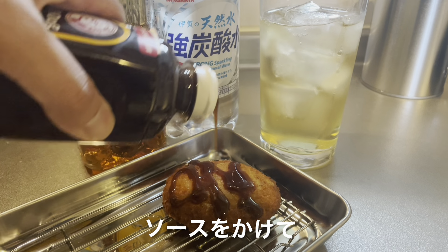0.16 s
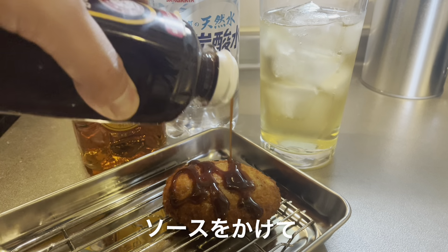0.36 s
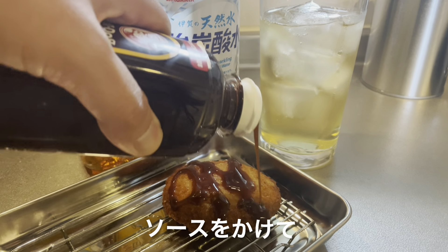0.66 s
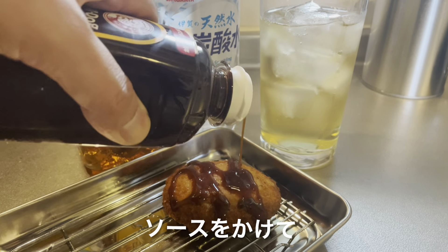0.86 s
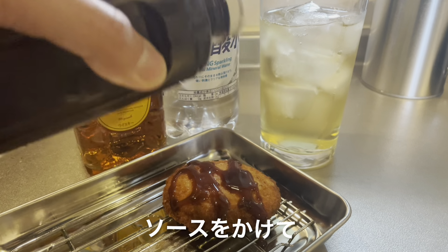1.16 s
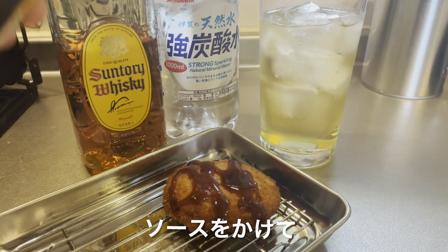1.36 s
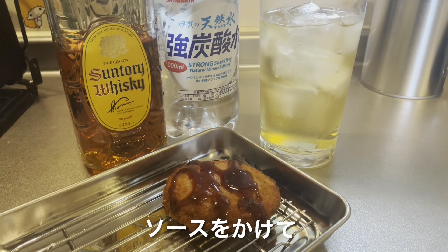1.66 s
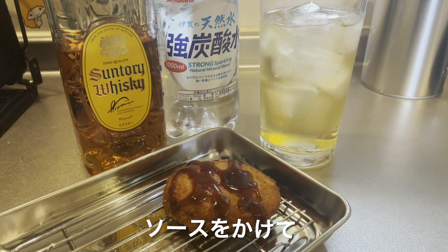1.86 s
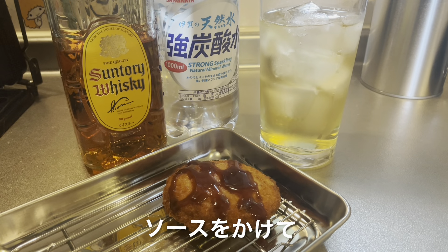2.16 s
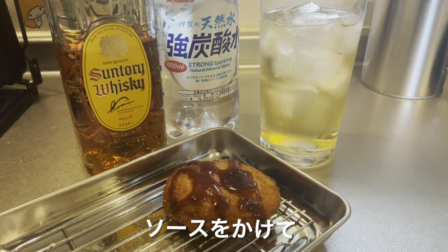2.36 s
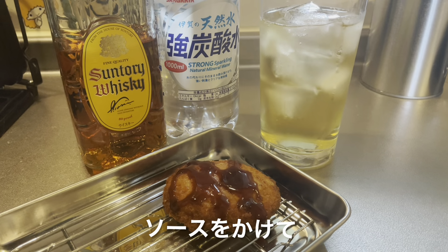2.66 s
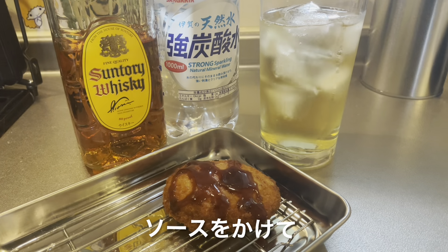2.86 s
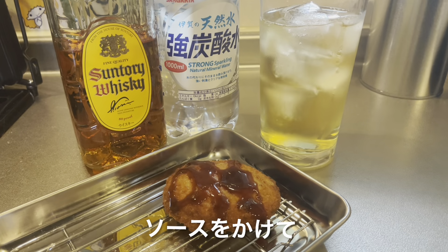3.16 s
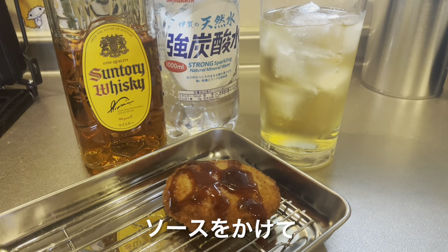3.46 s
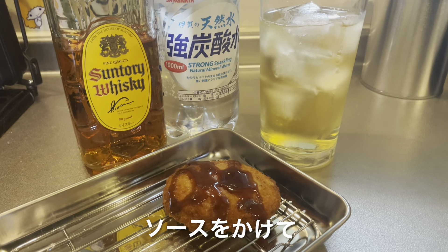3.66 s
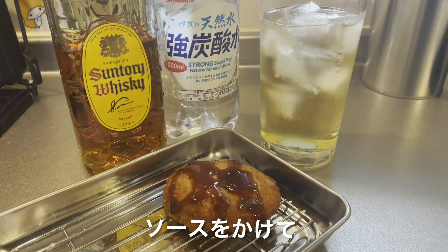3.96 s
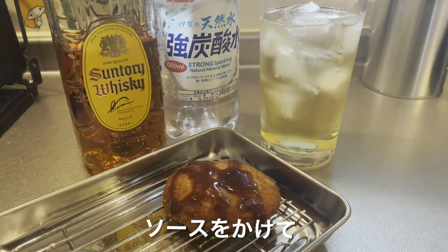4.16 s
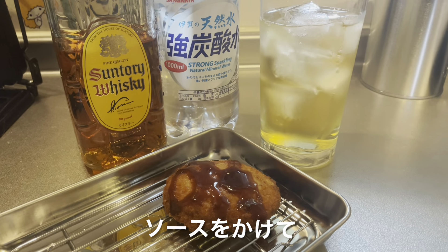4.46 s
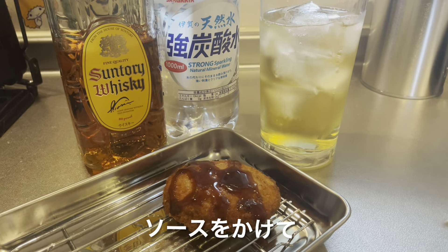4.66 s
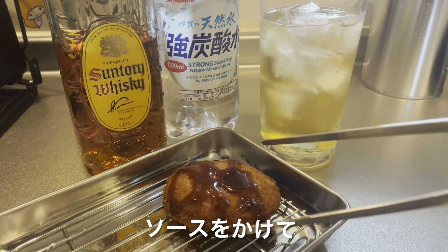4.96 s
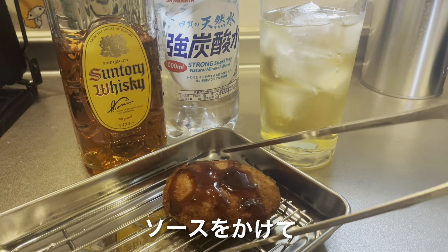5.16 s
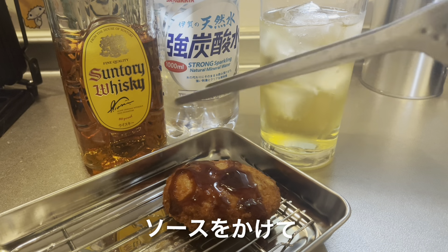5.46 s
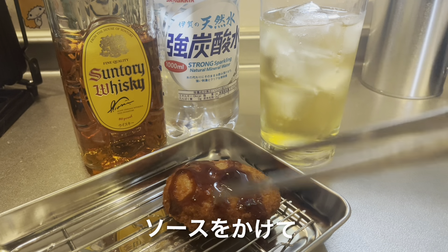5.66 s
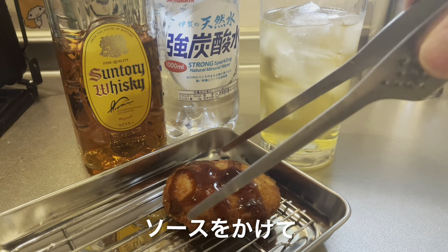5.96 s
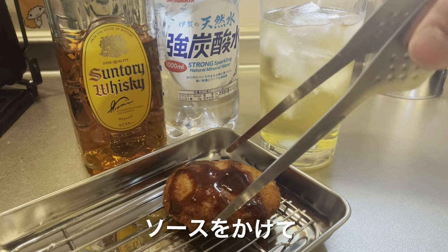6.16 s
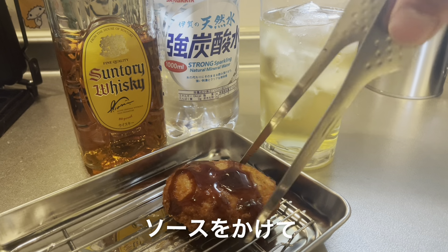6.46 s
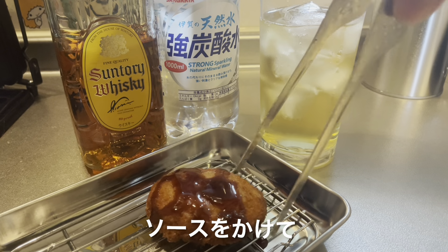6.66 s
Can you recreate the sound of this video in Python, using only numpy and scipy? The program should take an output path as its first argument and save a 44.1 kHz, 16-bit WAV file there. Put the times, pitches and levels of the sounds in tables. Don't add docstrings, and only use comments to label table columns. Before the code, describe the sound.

A small, hard home kitchen heard close up, with a steady low refrigerator hum, soft rumble and slight hiss that swells around 3 s. The first second is nearly still. At 1.0 s a plastic bottle creaks faintly, and at 1.25 s its lid clicks and snaps. Tiny handling ticks follow near 1.5 s. At 2.1 s the cap knocks the neck, rattles, rebounds and grinds, snapping shut sharply at 2.35 s. At 2.52 s the bottle lands hard, the loudest moment, rocking briefly. Around 3.5 s a cupboard door thuds, booms low and bounces several times. Light ticks at 3.7 and 4.2 s. From 4.35 to 4.6 s metal tongs drag off the counter with taps and a faint ping. Quiet returns until 6.15 s, when their tips tick and ring on wires, then scrape rack and steel tray in short, damped strokes until about 6.75 s.

```python
import sys
import numpy as np
from scipy import signal
from scipy.fft import rfft, irfft, next_fast_len
from scipy.io import wavfile
from scipy.ndimage import map_coordinates

SR = 44100
rng = np.random.default_rng(int(sys.argv[2]) if len(sys.argv) > 2 else 0)


def field_ratio(decibels):
    return 10 ** (np.asarray(decibels, dtype=float) / 20)


def wav_out(sig):
    wavfile.write(sys.argv[1], SR, np.round(np.clip(np.atleast_2d(sig).T, -1, 1) * 32767).astype(np.int16))


N = 300321
T = np.arange(N) / SR


def unit(x):
    return x / np.sqrt(np.mean(x ** 2) + 1e-20)


def along(points, hz):
    f, v = np.transpose(points)
    return np.interp(np.log(hz + 1), np.log(f + 1), v)


def gains(rows):
    return field_ratio(np.interp(T, *np.transpose(rows)))


def wobble(rate):
    coarse = T[::SR // 1000]
    knots = rng.standard_normal(int(N * rate / SR) + 4)
    return np.interp(T, coarse, map_coordinates(knots, [coarse * rate]))


def swells(rows, slower=1):
    s, db, rise, fall = np.transpose(rows)[:4, :, None]
    return field_ratio(db - 20 * np.maximum((s - T) / rise, (T - s) / (fall * slower)))


def filtered(x, response):
    m = next_fast_len(x.shape[-1] + SR // 4)
    spectrum = rfft(x, m) * response(np.fft.rfftfreq(m, 1 / SR))
    return irfft(spectrum, m)[..., :x.shape[-1]]


def colour(points):
    return lambda hz: field_ratio(along(points, hz))


def body(modes):
    def response(f):
        total = 0
        for k, (centre, width, db) in enumerate(modes):
            damping = 1j * f * width
            total = total + (-1) ** k * field_ratio(db) * damping / (centre * centre - f * f + damping)
        return total
    return response


def soft(hz):
    return lambda f: 1 / (1 + 1j * f / hz) ** 2


def ringing(force, response):
    answer = irfft(response(np.fft.rfftfreq(SR // 5, 1 / SR)))
    return filtered(force, response) / np.abs(answer).max(axis=-1, keepdims=True)


def grit(rate, rough_db):
    return rng.standard_normal(N) * field_ratio(rough_db * wobble(rate))


# pitch_hz, t60_s
KITCHEN_DECAY = [(60, 0.11), (300, 0.44), (1500, .37), (5000, 0.37), (12000, 0.33)]


def room(x, wet_db):
    hz, t, z = signal.stft(rng.standard_normal(SR // 2), SR, nperseg=256)
    decay = field_ratio(-60 * t / along(KITCHEN_DECAY, hz)[:, None])
    tail = signal.istft(z * decay, SR, nperseg=256)[1]
    tail = tail * np.minimum(np.arange(len(tail)) / 200, 1)
    tail = np.pad(tail, (150, 0))
    return field_ratio(wet_db) * signal.fftconvolve(x, tail / np.linalg.norm(tail))[:len(x)]


# pitch_hz, level_db
CRACK_COLOUR = [(350, -38), (600, -10.5), (1440, -9.5), (2330, -16.5), (2830, -18.5), (3870, -24.5),
                (5460, -18.5), (6170, -16.5), (11100, -34), (13700, -32), (15900, -27)]
# pitch_hz, width_hz, level_db
COUNTER = [(61, 36, -3.5), (113, 16, -2), (169, 10, 0), (255, 290, -8)]


def struck(contacts, modes, wet_db, loose, soft_hz):
    blur = 2.8
    times = np.round(np.transpose(contacts)[0] * SR).astype(int)
    start, stop = times.min() - SR // 50, times.max() + SR * 3 // 5
    blows, cracks, thumps = np.zeros((3, 2, stop - start))
    t = np.arange(SR // 10) / SR
    for at, (_, db, crack_db, thump_db, ms) in zip(times - start, contacts):
        chatter = rng.standard_normal(len(t)) * np.exp(-t * 1000 / ms) * (1 - np.exp(-t / 0.0011))
        chatter /= np.linalg.norm(chatter)
        blows[:, at] += field_ratio(db) * np.array([1, np.hypot(1, loose)])
        blows[0, at:at + len(t)] += loose * field_ratio(db) * chatter
        cracks[0, at:at + len(t)] += field_ratio(db + crack_db + 17.5) * chatter
        cracks[1, at + SR // 150] += field_ratio(db + crack_db + 18)
        thumps[:, at] += field_ratio(db + thump_db)
    wide = [(hz, width * blur, db) for hz, width, db in modes]
    near_and_walls = lambda f: np.array([body(modes)(f), body(wide)(f)]) * soft(soft_hz)(f)
    sound = ringing(blows, near_and_walls) * [[1], [np.sqrt(blur)]]
    sound += ringing(cracks, colour(CRACK_COLOUR))
    sound += ringing(thumps, lambda f: body(COUNTER)(f) * soft(600)(f))
    return np.pad(sound[0] + room(sound[1], wet_db), (start, N))[:N]


# start_s, level_db
HISS_LEVEL = [(0, -73), (1.5, -72), (2.9, -66.5), (5, -70.5), (6.81, -72.5)]
# pitch_hz, level_db
HISS_COLOUR = [(150, -30.5), (250, -4), (400, -7.5), (700, -9), (1240, -11.5), (2100, -15.5), (3500, -19.5),
               (6000, -23.5), (8000, -26.5), (10500, -33.5), (13000, -28.5), (15900, -25)]
# pitch_hz, level_db (per Hz)
RUMBLE_COLOUR = [(15, -55), (28, -13), (45, -2.5), (85, 2.5), (113, -10), (124, -8), (190, -11),
                 (339, -14.5), (375, -20), (500, -22), (650, -40.5), (1100, -120)]
# pitch_hz, level_db (rms)
HUM = [(102.3, -67), (199.2, -68), (452.2, -77), (500.6, -79.5), (597.5, -82.5), (748.3, -80.5),
       (1050, -87), (1098, -84), (1152, -81.5), (1249, -79.5), (1351, -80), (1550, -90.5), (1701, -94),
       (1852, -87.5)]


def kitchen():
    rumble = field_ratio(-60.5 + 0.51 * T) * field_ratio(1.3 * wobble(2.5))
    rumble *= unit(filtered(rng.standard_normal(N), colour(RUMBLE_COLOUR)))
    hiss = field_ratio(4.5) * gains(HISS_LEVEL) * unit(filtered(rng.standard_normal(N), colour(HISS_COLOUR)))
    hum = 0
    for hz, db in HUM:
        level = field_ratio(db + 3.0 + 0.67 * wobble(2.9))
        hum = hum + level * np.sin(2 * np.pi * hz * T + 0.13 * wobble(32))
    return rumble + hiss + hum


# start_s, level_db, crack_db, thump_db, chatter_ms
TICKS = [(1.4595, -46, -23, -37, 2.7), (1.5474, -51.5, -9.5, -40, 30), (1.6194, -58, -33, -28.5, 2.6),
         (2.3156, -35.5, -6.5, -44, 7.3), (2.3214, -36.5, -4.5, -42, 4.5), (2.9098, -51, -3.5, -24, 4.9),
         (3.701, -49, 1, -39.5, 17), (3.7738, -53, -12, -43, 9.3), (4.1949, -46, -4.5, -37, 7.4),
         (5.1554, -58, -15, -39, 5.4),
         (1.4515, -54, -12, -40, 6), (2.507, -43, -6, -40, 4), (3.709, -54, -8, -40, 4),
                 (4.189, -52, -5, -40, 3)]
# pitch_hz, width_hz, level_db
TICK_BODY = [(750, 200, -2.5), (1510, 300, -6.5), (3800, 1500, 2.5), (6400, 2100, 5), (8150, 820, -10.5)]


def ticks():
    return struck(TICKS, TICK_BODY, -11.0, 1.4, 11000)


# start_s, level_db, crack_db, thump_db, chatter_ms
DOOR = [
    (3.5175, -23, -21.5, -13.5, 4.4),
    (3.527, -29, -39, -19, 2.8),
    (3.548, -40, -40, -13, 3.7),
    (3.567, -35.5, -15.5, -18, 7.5),
    (3.598, -35, -14, -20, 3.3),
]
# pitch_hz, width_hz, level_db
DOOR_BODY = [(322, 76, -7), (731, 110, 4.5), (1078, 1600, -23), (1300, 530, -18), (2300, 400, -35)]
# start_s, level_db, crack_db, thump_db, chatter_ms
BOOM = [(3.527, -18.5, -57, -25, 7.9), (3.546, -21, -60, -30, 6.2), (3.566, -24, -60, -29, 5),
        (3.582, -33, -63, -28, 5.5), (3.603, -20, -60, -32, 7.8), (3.63, -31.5, -60, -29, 4.5)]
# pitch_hz, width_hz, level_db
BOOM_BODY = [(59.5, 22, -3.5), (121.6, 39, 0), (166, 45, 0), (340, 86, -12)]
# peak_s, level_db, rise_s, fall_s
SHIVER = [(3.61, -34, .01, 0.15), (4.2, -52, 2.6, 0.1), (4.324, -48, .06, 0.092), (4.574, -61, 0.17, 0.2),
          (5.176, -55, 0.84, 0.28)]


def cupboard():
    phase = 2 * np.pi * np.cumsum(50 + 1.5 * wobble(3.7)) / SR
    after_bump = T > DOOR[0][0]
    swing = np.sqrt(2) * after_bump * swells(SHIVER).sum(axis=0) * np.sin(phase)
    bump = struck(DOOR, DOOR_BODY, -8, 1.0, 2900)
    return bump - struck(BOOM, BOOM_BODY, -12.5, 0.27, 370) + swing


# start_s, level_db, crack_db, thump_db, chatter_ms
SQUEEZE = [(0.986, -45, -32, -22, 2), (0.988, -41.5, -27, -27, 4.2), (0.996, -47, -39, -26, 6.1)]
# pitch_hz, width_hz, level_db
SQUEEZE_BODY = [(624, 170, 2.5), (1390, 100, 6.5), (2200, 500, -5.5), (3600, 860, -14), (6240, 420, -13)]
# start_s, level_db, crack_db, thump_db, chatter_ms
LID = [(1.2325, -38, -19.5, -40, 0.9)]
# pitch_hz, width_hz, level_db
LID_BODY = [(2030, 80, 5), (1630, 300, -8)]
# start_s, level_db, crack_db, thump_db, chatter_ms
SNAP = [(1.269, -24.5, -22, -13, 0.7), (1.2718, -24.5, -36.5, -38, 0.5)]
# pitch_hz, width_hz, level_db
SNAP_BODY = [(491, 49, 4), (1510, 140, 4.5), (1740, 500, -5.5), (2090, 170, 2), (2830, 640, -16),
             (3420, 400, -30), (4170, 280, -14), (4500, 280, -14), (5400, 640, -13)]
# start_s, level_db, crack_db, thump_db, chatter_ms
CAP = [(2.1007, -11.5, -30.5, -26.5, 2), (2.1064, -12.5, -27.5, -20, 1.9)]
# pitch_hz, width_hz, level_db
CAP_BODY = [(371, 80, -9), (732, 54, -17), (1300, 84, 0.5), (1840, 58, -11.5), (3570, 180, -17.5),
            (5000, 200, -17.5), (5890, 380, -23)]
# start_s, level_db, crack_db, thump_db, chatter_ms
GRIND = [(2.1895, -24.5, -12, -38, 4), (2.1925, -23, -6, -40.5, 4), (2.1955, -26, -12.5, -41, 5)]
# pitch_hz, width_hz, level_db
GRIND_BODY = [(159.8, 23, -5), (407, 87, -10.5), (1400, 230, -1), (2010, 63, -12), (3080, 150, -9.5),
              (3690, 450, -12.5), (4720, 380, -10), (6200, 110, -8.5)]
# start_s, level_db, crack_db, thump_db, chatter_ms
RATTLE = [(2.1585, -15, -20.5, -43, 2.9)]
# pitch_hz, width_hz, level_db
RATTLE_BODY = [(1230, 140, -5.5), (1320, 110, 4.5), (1400, 270, -3), (3300, 200, -18), (4700, 410, -13),
               (5923, 600, -19)]
# start_s, level_db, crack_db, thump_db, chatter_ms
REBOUND = [(2.1718, -17.5, -39, -45.5, 0.95), (2.184, -28.5, -45.5, -53, 1)]
# start_s, level_db, crack_db, thump_db, chatter_ms
SHUT = [(2.3483, -15, -10, -26.5, 1.4), (2.3496, -15, -19, -26.5, 0.36), (2.3507, -7, -21.5, -19, 1.2)]
# pitch_hz, width_hz, level_db
SHUT_BODY = [(190, 57, -2), (348, 140, -15.5), (520, 100, -14.5), (737, 120, -4), (865, 63, -3.5),
             (1284, 98, -6.5), (2060, 81, -6), (2320, 190, -0.5), (2680, 200, -3.5), (3060, 350, -16),
             (3570, 130, 0), (3780, 410, -6.5), (4980, 82, -5), (5730, 260, -15), (8850, 4500, -28)]
# start_s, level_db, crack_db, thump_db, chatter_ms
BOTTLE = [
    (2.5225, -19.5, -12.5, -40.5, 1.7),
    (2.5241, -2.5, -9.5, -13.5, 2.5),
    (2.5312, -12.5, -14, -13.5, 3),
    (2.5395, -18.5, -24, -12.5, 2),
    (2.549, -16, -30.5, -21.5, 1.6),
]
# pitch_hz, width_hz, level_db
BOTTLE_BODY = [(187, 84, -7), (291, 82, -6), (430, 22, -8.5), (578, 47, -5.5), (710.2, 27, -4.5),
               (870, 67, -7.5), (1370, 110, 0), (1520, 90, 0.5), (2120, 100, -5), (2300, 130, -8.5),
               (3350, 190, -12.5), (4320, 360, -14.5), (6250, 830, -20), (8130, 930, -17)]


def bottle():
    clicks = struck(SQUEEZE, SQUEEZE_BODY, -12.0, 1.53, 6000)
    clicks += struck(LID, LID_BODY, -10.5, .1, 4000)
    clicks += struck(SNAP, SNAP_BODY, -13, 1.0, 4800)
    cap = struck(CAP, CAP_BODY, -12.5, 0.14, 5000)
    cap += struck(GRIND, GRIND_BODY, -14.5, 1.7, 8000)
    cap += struck(RATTLE, RATTLE_BODY, -10.5, .1, 4500)
    cap += struck(REBOUND, RATTLE_BODY[:3], -10.5, .1, 1100)
    cap += struck(SHUT, SHUT_BODY, -14.0, 0.96, 10000)
    return clicks + cap + struck(BOTTLE, BOTTLE_BODY, -8.5, 0.43, 8000)


# peak_s, level_db, rise_s, fall_s, grit_over_body_db
DRAG = [(4.346, -55, .004, 0.035, -9), (4.363, -49.5, .015, .03, -13), (4.39, -28, 0.029, 0.035, -13),
        (4.43, -41.5, 0.024, 0.038, -18.5), (4.47, -44, 0.024, 0.07, -19),
        (4.507, -49.5, 0.054, 0.0364, -10.5), (4.61, -68, 0.18, 0.17, 5.5)]
# pitch_hz, width_hz, level_db
DRAG_BODY = [(179, 55, -4), (303, 100, -3.5), (442, 80, 2), (710, 49, -4.5), (980, 80, 1),
             (1260, 150, -5.5), (1526, 110, -9), (2240, 120, -13)]
# pitch_hz, width_hz, level_db
DRAG_LIFTED = [(184, 80, 0), (303, 120, 5), (490, 90, -3), (640, 36, -2), (1087, 320, -10),
               (1530, 240, -10.5)]
# pitch_hz, level_db
COARSE_GRIT = [(800, -35), (2000, 1), (4000, 2), (7000, -3), (9000, -10), (12000, -53)]
# pitch_hz, level_db
FINE_GRIT = [(6000, -30), (9000, -5.5), (11000, -10.5), (14000, -5), (15900, -4.5)]
# pitch_hz, width_hz, level_db
ARMS = [(5765, 100, 2), (6700, 60, 1.5), (10400, 79, -14), (12300, 92, -21), (13700, 300, -16)]
# pitch_hz, width_hz, level_db
ARMS_LIFTED = [(7700, 40, -3), (8950, 40, -4), (10300, 56, -8), (11800, 50, -5), (15400, 100, 7.5)]
# start_s, level_db, crack_db, thump_db, chatter_ms
TIPS = [(4.3455, -55, -11.5, -24, 4), (4.37, -37, -2, -27, 8.4), (4.378, -36, -15, -23, 4.6),
        (4.405, -39, -5, -23, 2.6), (4.482, -39, -33.5, -28, 9.8), (4.493, -36.5, -27.5, -28.5, 12),
        (4.508, -38, -18, -33, 0.98)]
# pitch_hz, width_hz, level_db
TIP_BODY = [(990, 200, -34), (2110, 220, -0.5), (3530, 330, -8.5), (5130, 430, -9.5)]
# start_s, level_db, crack_db, thump_db, chatter_ms
PING = [(4.405, -46, -40, -38, 2.8)]
# pitch_hz, width_hz, level_db
PING_BODY = [(3560, 8.6, 9), (6340, 30, -19)]


def drag():
    strokes, grit_db = swells(DRAG), np.transpose(DRAG)[-1]
    low = strokes.sum(axis=0)
    mid = field_ratio(grit_db) @ strokes
    high = field_ratio(1.2 * grit_db - 7) @ strokes
    force, down = grit(150, 1.44), T < 4.5
    lift = np.clip((T - 4.405) / 0.031, 0, 1)
    resting = unit(filtered(force, body(DRAG_BODY)))
    leaving = unit(filtered(force, body(DRAG_LIFTED)))
    slide = low * ((1 - lift) * resting + lift * leaving)
    slide += mid * unit(filtered(force, colour(COARSE_GRIT)))
    slide += high * unit(filtered(force, colour(FINE_GRIT)))
    slide += field_ratio(-24.0) * ringing(down * high * force, body(ARMS))
    slide += field_ratio(-33.5) * ringing(~down * high * grit(30, 2.6), body(ARMS_LIFTED))
    taps = struck(TIPS, TIP_BODY, -13.0, 1.6, 6800) + struck(PING, PING_BODY, -18, 0.35, 12000)
    return slide + room(slide, -10.0) + taps


# peak_s, level_db (tray rim), rise_s, fall_s, wires_over_rim_db
SCRAPE = [(6.166, -53, .008, 0.088, 4), (6.224, -53.5, 0.08, 0.012, 0), (6.356, -43.5, 0.0078, 0.079, -5),
          (6.45, -43, 0.043, 0.007, -10.5), (6.516, -47, 0.01, 0.04, -4), (6.562, -48.5, .03, 0.027, -5),
          (6.598, -63, 0.016, 0.035, -1), (6.632, -46, 0.041, 0.034, -10.5),
          (6.65, -50.5, 0.027, 0.095, -17), (6.78, -69, 0.394, 0.019, -18)]
# pitch_hz, width_hz, level_db
TRAY_NEAR = [(1260, 300, -14), (1840, 250, -4.5), (2320, 65, 6), (2680, 150, -5.5), (3250, 250, -4.5),
             (3610, 110, -8.5), (4250, 200, -13), (4620, 150, -12), (5310, 120, -5.5)]
# pitch_hz, width_hz, level_db
TRAY_HELD = [(1010, 61, -5), (1600, 200, -6), (2100, 130, 3), (2730, 120, -10), (3285, 70, -0.5),
             (3550, 100, -15), (4570, 90, -5), (4790, 150, -11)]
# pitch_hz, width_hz, level_db
TRAY_FAR = [(986, 42.4, -1.5), (1830, 64, -0.5), (2010, 100, 0.5), (2300, 180, 0.5), (2770, 80, -7.5),
            (3440, 110, -5.5), (3980, 100, -14), (4600, 150, -9), (5100, 100, -16)]
# pitch_hz, width_hz, level_db
EDGE = [(1530, 68, -6.5), (2140, 58, 0), (2310, 46, -0.5), (2480, 70, -9), (2770, 55, -6), (3200, 57, -2),
        (3660, 28, -3), (4330, 50, -9), (4600, 80, -18), (5000, 60, -16)]
# pitch_hz, width_hz, level_db
FLOOR_PAN = [(142.6, 72, 1), (258, 200, -2.5), (540, 230, -1), (840, 390, -7)]
# start_s, level_db, crack_db, thump_db, chatter_ms
KNOCK = [(6.355, -35, -30, -38, 2.5), (6.366, -38, -32, -26, 5), (6.375, -38.5, -25, -22.5, 8),
         (6.386, -47, -30, -20.5, 3.6), (6.642, -48.5, -29, 5, 6.4)]
# pitch_hz, width_hz, level_db
FREE_WIRES = [(2290, 15, -2), (3300, 50, -10), (4150, 39, -4), (4530, 67, -18), (5270, 98, -2.5),
              (5860, 53, -15.5), (6330, 43, 0), (6800, 78, -3), (7650, 45, 1.5), (8350, 50, -6),
              (9070, 80, -3), (9500, 65, -5), (10500, 72, -10), (12000, 80, -10), (12800, 60, -19),
              (13900, 74, -12), (14300, 85, -4), (15300, 100, -5)]
# pitch_hz, width_hz, level_db
DAMPED_WIRES = [(3340, 180, -4), (4550, 180, -0.5), (5590, 150, -2.5), (6360, 89, -1.5), (6850, 70, -3),
                (7540, 100, 0), (9020, 105, -0.5), (10400, 170, -8), (12000, 130, -7), (13250, 130, -5),
                (14450, 120, -4), (15350, 150, -1)]
# start_s, level_db, crack_db, thump_db, chatter_ms
FREE_TAPS = [(6.1599, -41, -10, -26, 6.7), (6.181, -48, -10.5, -28, 6), (6.2053, -46, -20, -26.5, 9.3),
             (6.219, -46.5, -16, -20, 5)]
# start_s, level_db, crack_db, thump_db, chatter_ms
DAMPED_TAPS = [(6.355, -39, -10, -36, 14), (6.4273, -45, 1.5, -23, 5.8), (6.4474, -43.5, -9, -34, 3.9),
               (6.497, -53, -10, -40, 3), (6.5131, -40.5, -3, -36, 6), (6.5463, -51, 6, -29, 2.3),
               (6.562, -52, -10, -35, 4), (6.5937, -46, -3, -21, 2.2), (6.609, -51.5, -9.5, -33, 3),
               (6.634, -56, -3, -31, 2.7), (6.6431, -48, -5, -30, 2.9), (6.685, -55, -8, -35, 3),
               (6.705, -54, -6, -32, 3), (6.7678, -69, 5, -26.5, 3)]


def scrape():
    strokes = swells(SCRAPE)
    rack = field_ratio(np.transpose(SCRAPE)[-1]) @ strokes
    rub = grit(140, 2.6)
    rim = 0
    for part, modes in zip(np.split(strokes, (3, 4)), (TRAY_NEAR, TRAY_HELD, TRAY_FAR)):
        rim = rim + part.sum(axis=0) * unit(filtered(rub, body(modes)))
    shakes = [(s, db - 15, 0.0044, 0.019) for s, db, *_ in KNOCK]
    floor = field_ratio(-5) * swells(SCRAPE[:-2], 1.5).sum(axis=0) + swells(shakes).sum(axis=0)
    force, first = grit(110, 4), T < 6.31
    wires = field_ratio(-22.0) * ringing(first * rack * force, body(FREE_WIRES))
    wires += field_ratio(-13.0) * ringing(~first * rack * force, body(DAMPED_WIRES))
    wires += field_ratio(np.where(first, -16, -10)) * rack * unit(filtered(force, colour(FINE_GRIT)))
    pan = field_ratio(-4) * rim + floor * unit(filtered(grit(90, 1.3), body(FLOOR_PAN)))
    pan += field_ratio(1.0) * strokes[-2:].sum(axis=0) * unit(filtered(grit(60, 2.2), body(EDGE)))
    taps = struck(FREE_TAPS, FREE_WIRES, -22, 0.85, 14300)
    taps += struck(DAMPED_TAPS, DAMPED_WIRES, -6.0, 1.0, 10000)
    knocks = struck(KNOCK, FLOOR_PAN, -14.5, 0.92, 3300)
    return wires + pan + room(wires + pan, -10.0) + taps + knocks


def scene():
    return (kitchen() + ticks() + cupboard() + bottle() + drag() + scrape())[None]


def roll_off(x):
    return signal.sosfilt(signal.butter(12, 16490, fs=SR, output="sos"), x)


def record(dry):
    held = dry / (1 + np.abs(dry / 1.5) ** 4) ** .25

    def band(hz):
        low_cut = (1j * hz / 22 / (1 + 1j * hz / 22)) ** 2
        return np.where(hz < 15850, 1, field_ratio(-18.0)) * low_cut

    return roll_off(filtered(held, band))


dry = scene()
out = record(dry)
wav_out(out)
```